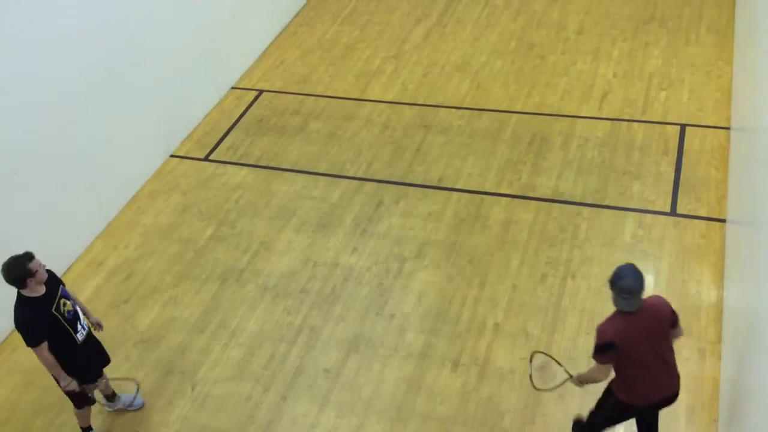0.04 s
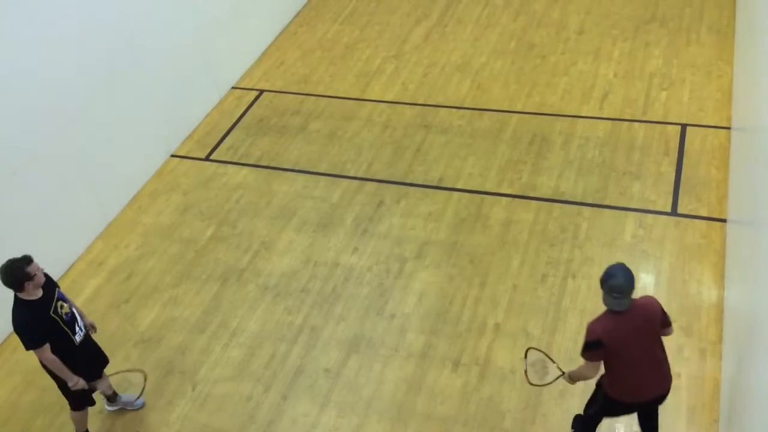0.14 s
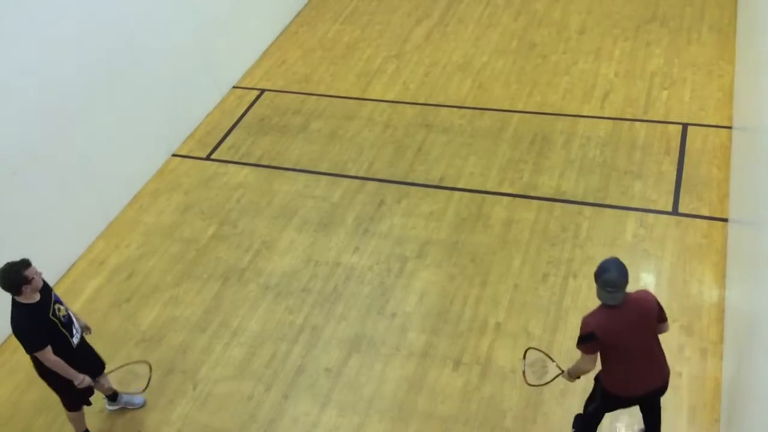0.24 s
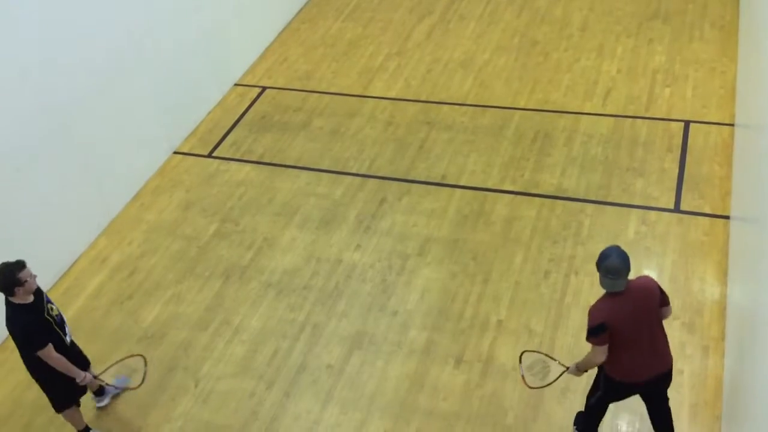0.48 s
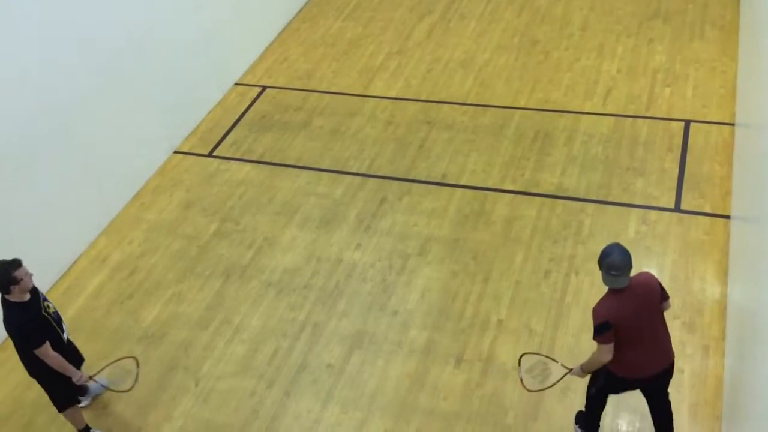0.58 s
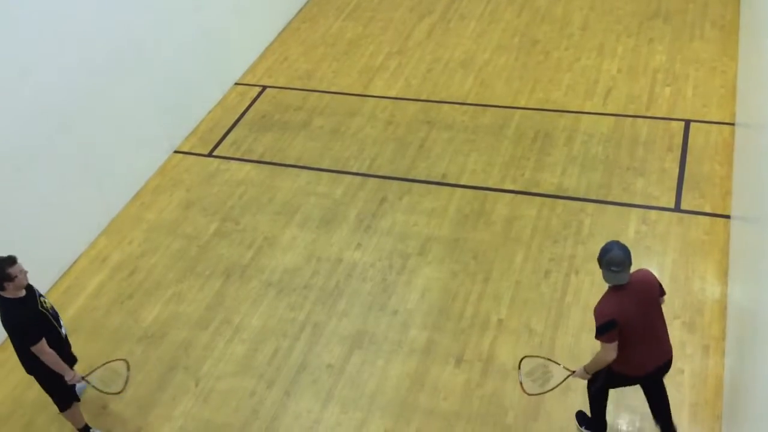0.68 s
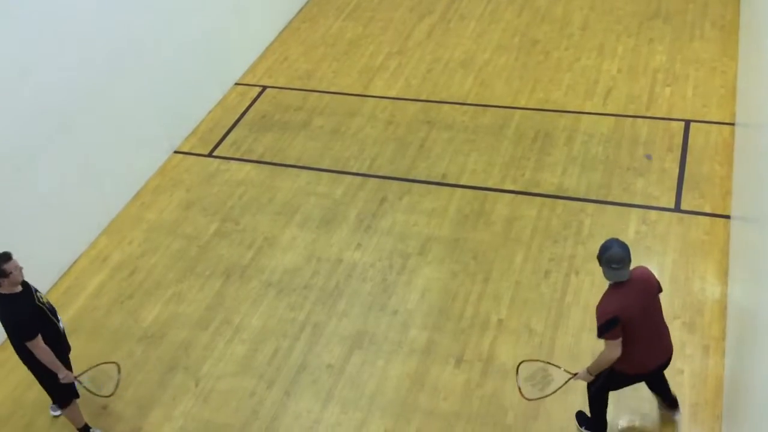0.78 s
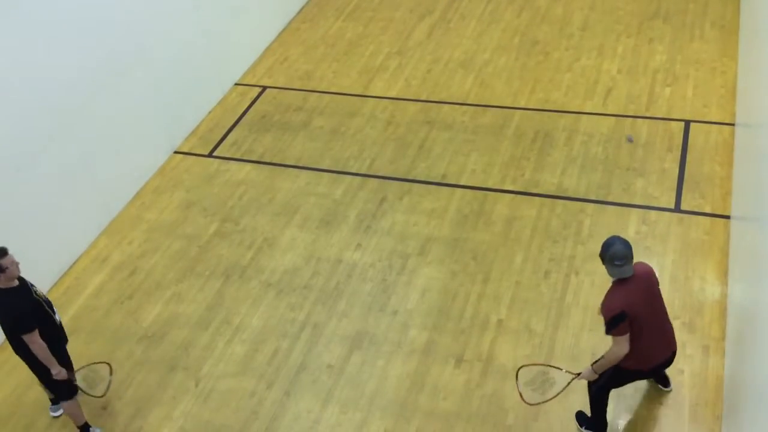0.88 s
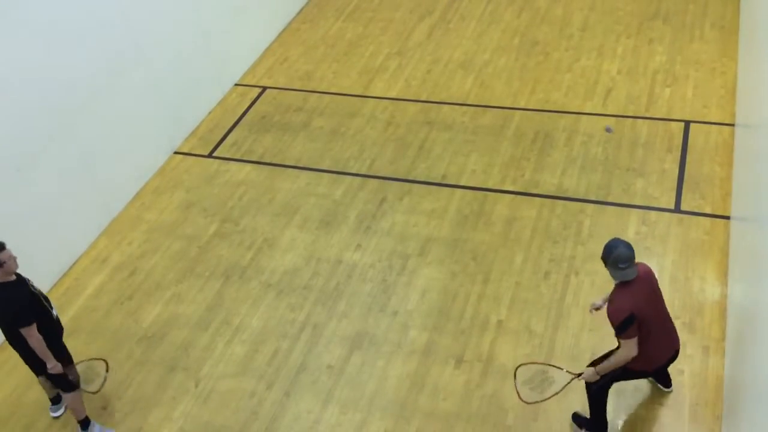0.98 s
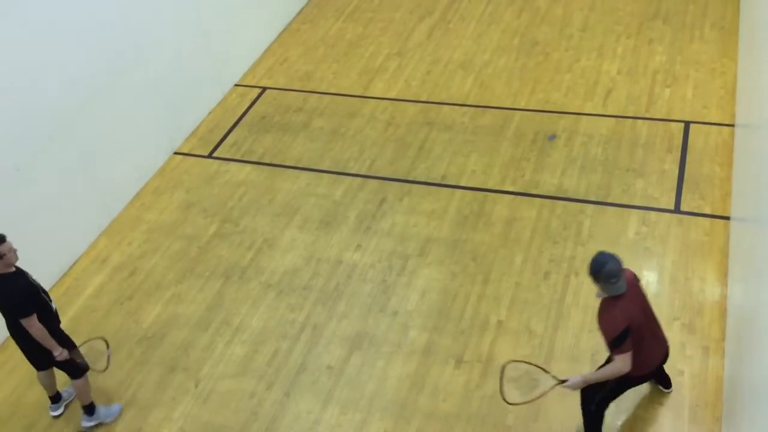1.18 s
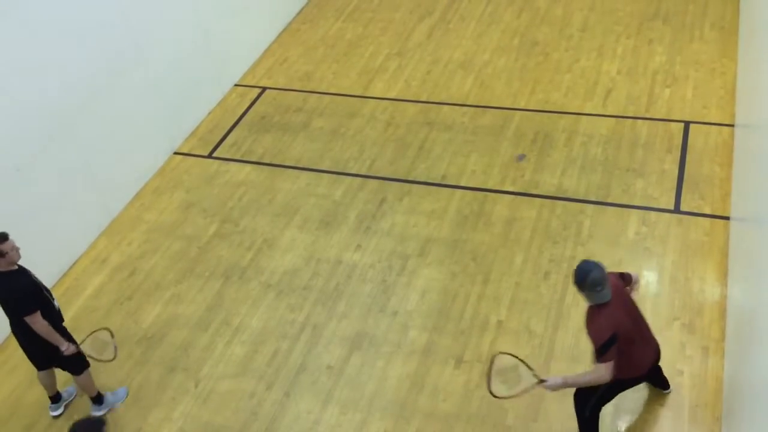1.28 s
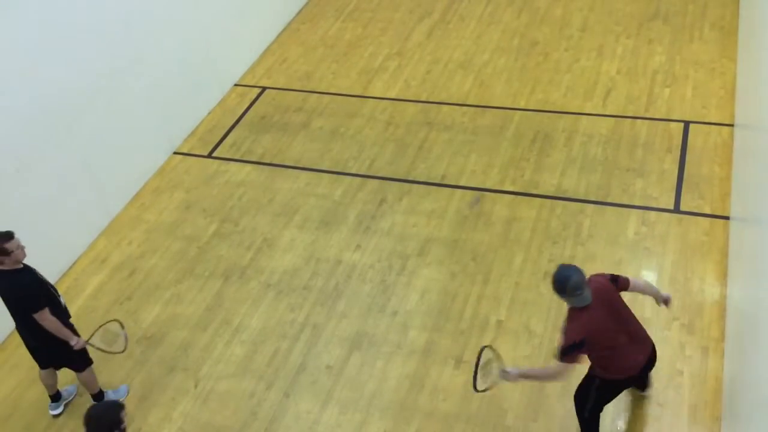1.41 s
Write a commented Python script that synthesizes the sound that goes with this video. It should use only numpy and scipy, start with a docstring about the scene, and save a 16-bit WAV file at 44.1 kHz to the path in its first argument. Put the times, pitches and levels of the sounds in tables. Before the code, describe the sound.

A racket cracks sharply against a hollow rubber ball at about 0.2 seconds, over steady air noise and an earlier shot's fading echo. The ball pings off far walls at 0.3 and, more softly, 0.6 seconds, then thuds on the wooden floor at 0.9. Faint footfalls come between 0.4 and 1.4 seconds, with a shoe scuff and faint rising squeak near 1 second. The indoor court reverberates throughout.

```python
"""Racket and ball in an indoor court

A hollow rubber ball is struck with a racket, hits the far walls and bounces on the wooden floor.
Each contact cracks and rings the air inside the ball; near walls slap back at the microphone,
then the closed, hard-walled court reverberates. Shoes thud and scuff, a faint whoop rises,
and the echo of the previous shot dies away over steady air noise."""
import sys
import numpy as np
from scipy import signal
from scipy.fft import rfft, irfft
from scipy.io import wavfile

SR = 44100
rng = np.random.default_rng(int(sys.argv[2]) if len(sys.argv) > 2 else 0)


def master(y):
    """Save y as 16-bit WAV."""
    cut = np.clip(np.atleast_2d(y).T, -1, 1)
    pcm = np.round(cut * 32767)  # scale
    wavfile.write(sys.argv[1], SR, pcm.astype(np.int16))


N = 63945
TIME = np.arange(N) / SR
FREQS = np.fft.rfftfreq(N, 1 / SR)


# The crack at the racket. Each row: frequency in Hz, relative level in dB.
RACKET_CRACK = [(30, -45), (70, -5), (160, 4), (320, 1.5), (420, -13), (620, -0.5), (900, -1), (1200, 0.5),
                (2150, -3.5), (2700, -17.5), (3700, -16), (4500, -26.5), (8200, -30), (11000, -36),
                (15000, -63.5)]
# Near walls answering the stroke. Each row: delay in seconds, gain in dB over the direct sound.
STROKE_ECHOES = [(.0050, 10.5), (.0088, 5), (.0142, -30), (0.017, 2.5), (0.0197, -5), (0.0307, 7),
                 (0.0429, -5), (0.046, -3)]
# The strings. Each row: frequency in Hz, relative level in dB, seconds to fall 60 dB.
STRING_MODES = [(5500, 9, 0.0033), (6500, -19, 0.001), (7850, -2.5, .03)]

def racket_stroke(start_s=0.2345):
    """The racket cracks against the ball and its strings give a bright snap."""
    path = court(direct_db=-14.5, echoes=STROKE_ECHOES)
    hit = through(ball_impact(RACKET_CRACK, knock_db=-0.32, ring_db=-2.5), path)
    snap = undb(-25) * ring(STRING_MODES, rise_s=0.0001)
    snap_reverb = undb(1.5) * through(snap, reverb())
    return delayed(hit + snap + snap_reverb, start_s)


# The ball's air and shell. Each row: frequency in Hz, relative level in dB, seconds to fall 60 dB.
BALL_MODES = [(618.5, -14.5, 0.23), (762, -13, 0.024), (915, -11, 0.2), (975.7, 6, 0.07), (1017.4, -3, 0.1),
              (1171, -15.5, .07), (1345, -12, 0.085), (1550, -8, 0.045), (1844, -10, 0.091),
              (1908, -1.5, 0.024), (2110, -22.5, 0.07), (3240, -25, 0.062), (3482, -14, .02),
              (3763, -18, 0.042)]
CONTACT_S = 0.00088  # time the ball takes to start ringing

def ball_impact(colour, knock_db, ring_db):
    """A contact gives a short knock and sets off the hollow ping of the ball."""
    return undb(knock_db) * click(colour) + undb(ring_db) * ring(BALL_MODES, CONTACT_S)


# Hits far from the microphone. Each row: start in seconds, relative crack and ring levels in dB.
WALL_HITS = [(0.309, -10.5, -4), (0.559, -32, -9.5)]
# The crack at the wall. Each row: frequency in Hz, relative level in dB.
WALL_CRACK = [(30, -14), (150, 1), (430, -5.5), (900, 2), (2100, 0), (2800, -5), (3700, -4.5),
              (5500, -14.5), (8200, -25.5), (14000, -48)]
# Slaps after a wall hit. Each row: delay in seconds, gain in dB over the direct sound.
WALL_ECHOES = [(.0120, -1), (.0385, 5), (.0460, -2), (.0770, 0)]

def wall_hits():
    """The ball strikes the far walls; from that distance it is mostly reverberation."""
    out = np.zeros(N)
    for start_s, knock_db, ring_db in WALL_HITS:
        path = court(direct_db=-17.5, echoes=WALL_ECHOES)
        hit = ball_impact(WALL_CRACK, knock_db, ring_db)
        out += delayed(through(hit, path), start_s)
    return out


# The thump on the floor. Each row: frequency in Hz, relative level in dB.
FLOOR_THUMP = [(30, -43.5), (90, -3.5), (230, 0.5), (400, -13.5), (900, -7.5), (2100, -10.5), (4000, -26.5),
               (6000, -34), (8000, -40.5), (14000, -58)]
# Slaps after the bounce. Each row: delay in seconds, gain in dB over the direct sound.
BOUNCE_ECHOES = [(.0046, -5), (0.018, -5), (0.0393, -4)]
# The floorboards. Each row: frequency in Hz, relative level in dB, seconds to fall 60 dB.
BOARD_MODES = [(194, -6.5, 0.12), (276.8, 0, 0.19)]

def floor_bounce(start_s=0.9268):
    """The ball lands and the boards under it give a short, low thud."""
    path = court(direct_db=-11, echoes=BOUNCE_ECHOES)
    hit = through(ball_impact(FLOOR_THUMP, knock_db=-13, ring_db=-19), path)
    boards = undb(-17.5) * ring(BOARD_MODES, CONTACT_S)
    return delayed(hit + boards, start_s)


# Footfalls on the court. Each row: start in seconds, relative level in dB.
FOOTFALLS = [(0.448, -24), (0.568, -23), (1.001, -21), (1.149, -23), (1.354, -29)]
# A shoe landing, and a shoe sliding. Each row: frequency in Hz, relative level in dB.
STEP_COLOUR = [(30, -25), (80, -5.5), (170, -2), (350, -15), (1000, -30.5), (4000, -44), (14000, -84)]
SCUFF_COLOUR = [(100, -22), (700, 1), (1400, -17), (2000, 3.5), (2600, -15.5), (3800, 0), (4400, -17),
                (7000, -28.5), (14000, -46)]

def shoes():
    """Dull footfalls sound close to the microphone; one scuff arrives only as reverberation."""
    steps = np.zeros(N)
    for start_s, db in FOOTFALLS:
        thud = undb(db) * click(STEP_COLOUR)
        steps += delayed(through(thud, court(direct_db=-2)), start_s)
    slide = unit(noise(click(SCUFF_COLOUR)) * swell(peak_s=1.0, width_s=0.064))
    return steps + undb(-16) * through(slide, reverb())


def whoop(start_s=1.043, length_s=0.06, start_hz=240, rise_hz_per_s=10000):
    """A faint, short tone sweeps upward and lingers in the court."""
    t = np.clip(TIME - start_s, 0, length_s)
    tone = np.sin(2 * np.pi * (start_hz * t + rise_hz_per_s * t ** 2 / 2))
    arch = np.sqrt(np.abs(np.sin(np.pi * t / length_s)))
    return undb(-40) * through(tone * arch, court(direct_db=2.5))


# Light ticks. Each row: start in seconds, relative level in dB.
TICKS = [(.9268, -41.5), (.9314, -40), (.9447, -45), (.9478, -45), (1.293, -52)]
# Their bright colour. Each row: frequency in Hz, relative level in dB.
TICK_COLOUR = [(100, -8), (3000, 13.5), (6000, -7), (8000, 7.5), (10000, -9), (14000, -19)]

def ticks():
    """Small ticks at and after the bounce reach the microphone dry."""
    return sum(delayed(undb(db) * click(TICK_COLOUR), start_s) for start_s, db in TICKS)


# The player moving. Each row: frequency in Hz, relative level in dB.
RUSTLE_COLOUR = [(300, -23), (3000, 5), (7000, -3), (10000, -8.5), (14500, -16)]

def rustle():
    """A faint rustle as the player turns."""
    return undb(-64) * noise(click(RUSTLE_COLOUR)) * swell(peak_s=1.15, width_s=0.08)


def court(direct_db, echoes=(), dull_above_hz=6000):
    """The path to the microphone: direct sound, slaps dulled by the walls, reverberation."""
    slaps = np.zeros(N)
    for delay_s, db in echoes:
        slaps[round(delay_s * SR)] += undb(direct_db + db)
    pole = np.exp(-2 * np.pi * dull_above_hz / SR)
    path = reverb() + signal.lfilter([1 - pole], [1, -pole], slaps)
    path[0] += undb(direct_db)
    return path


# The tail of the closed court. Each row: frequency in Hz, seconds to fall 60 dB.
COURT_T60 = [(60, 2.7), (250, 1.85), (600, 1.56), (1000, 3.73), (1400, 1.15), (2000, 2.61), (3600, 2.97),
             (5500, 1.3), (8000, 1.08), (14000, 0.53)]

def reverb(bands=18, spread_db=5.5, build_s=0.002):
    """Reflections of uneven strength grow denser and fade, the high treble first; unit energy."""
    reflections_per_s = 5000 + 200000 * TIME ** 2
    chance = np.minimum(reflections_per_s / SR, 1)
    sizes = rng.choice([-1, 1], N) * undb(spread_db * np.clip(rng.standard_normal(N), -2, 2))
    arrives = rng.random(N) < chance
    spectrum = rfft(sizes * arrives / np.sqrt(chance))
    build = 1 - np.exp(-TIME / build_s)
    early = undb(1) * decay(t60_s=0.38)  # the first, faster part of the decay
    centres_hz = np.geomspace(50, 16000, bands)
    tail = np.zeros(N)
    for hz, weights in zip(centres_hz, np.eye(bands)):
        band = irfft(spectrum * on_log_axis(np.c_[centres_hz, weights], FREQS), N)
        tail += band * build * (1 + early) * decay(on_log_axis(COURT_T60, hz))
    return tail / np.sqrt(np.sum(tail ** 2))


# The last shot, still hanging in the court. Each row: frequency in Hz, relative level in dB.
LINGERING_COLOUR = [(30, -9.5), (70, -8.5), (110, -6), (155, 2), (220, -12), (450, -13.5), (620, -9.5),
                    (900, -2.5), (1250, -14.5), (1800, 4.5), (2700, -14), (3700, -4), (4500, -22.5),
                    (6500, -34), (9000, -42.5), (14000, -60.5)]

def previous_shot(fade_db_per_s=12.5):
    """The echo of an earlier crack and ping, smeared into noise, dies away."""
    wash = noise(click(LINGERING_COLOUR)) + noise(ring(BALL_MODES, CONTACT_S))
    return wash * undb(-37.5 - fade_db_per_s * TIME)


# Room tone at the microphone. Each row: frequency in Hz, relative level in dB.
AIR_COLOUR = [(30, -12.5), (80, 5.5), (170, 2.5), (400, -6), (900, -4), (2000, 0.5), (2800, -10.5),
              (3800, -8.5), (4600, -20), (7000, -36), (10000, -42.5), (15000, -66)]

def room_air():
    """Steady air noise fills the court."""
    return undb(-41) * noise(click(AIR_COLOUR))


def ring(modes, rise_s):
    """Damped modes set off together, eased in by the contact."""
    tones = sum(undb(db) * unit(np.sin(2 * np.pi * hz * TIME) * decay(t60)) for hz, db, t60 in modes)
    onset = 1 - np.exp(-(TIME / rise_s) ** 2)
    return unit(tones * onset)


def click(colour, size=4096):
    """The shortest causal pulse with this spectrum."""
    gains = undb(on_log_axis(colour, np.fft.rfftfreq(size, 1 / SR)))
    cepstrum = irfft(np.log(gains))
    cepstrum[1:size // 2] *= 2  # fold onto positive time for minimum phase
    cepstrum[size // 2 + 1:] = 0
    pulse = irfft(np.exp(rfft(cepstrum)))
    return unit(np.pad(pulse, (0, N - size)))


def noise(response):
    """Steady noise of unit RMS with the colour of a response."""
    coloured = irfft(rfft(rng.standard_normal(N)) * rfft(response, N), N)
    return coloured / np.std(coloured)


def swell(peak_s, width_s):
    """A bell-shaped rise and fall around a moment."""
    return np.exp(-0.5 * ((TIME - peak_s) / width_s) ** 2)


def unit(x):
    """Scale to the energy of a 10 ms burst at full level."""
    return x * np.sqrt(0.01 * SR / np.sum(x ** 2))


def on_log_axis(points, hz):
    """Read (Hz, value) points on a log-frequency axis."""
    points_hz, values = np.array(points, float).T
    return np.interp(np.log(np.maximum(hz, 1)), np.log(points_hz), values)


def decay(t60_s):
    return np.exp(-np.log(1000) * TIME / t60_s)


def undb(db):
    return 10 ** (np.asarray(db) / 20)


def through(x, response):
    return signal.fftconvolve(x, response)[:N]


def delayed(x, delay_s):
    return np.pad(x, (round(delay_s * SR), 0))[:N]


def scene():
    """One microphone in the court hears the rally over the sound of the room."""
    rally = racket_stroke() + wall_hits() + floor_bounce() + shoes() + ticks()
    return (undb(-11.5) * rally + whoop() + rustle() + previous_shot() + room_air())[None]


def record(dry, ceiling=0.48, top_hz=15200):
    """The recorder rounds off the loudest peaks and cuts the top."""
    rounded = dry / (1 + (dry / ceiling) ** 6) ** (1 / 6)
    lowpass = signal.ellip(8, 0.2, 80, top_hz, fs=SR, output="sos")
    return signal.sosfilt(lowpass, rounded)


dry = scene()
out = record(dry)
master(out)
```